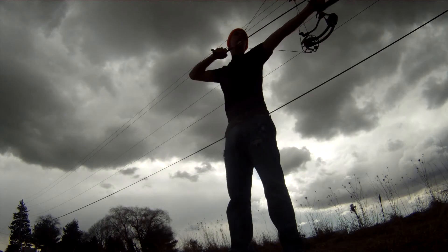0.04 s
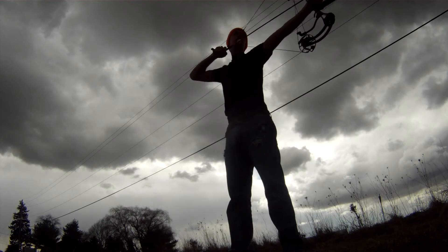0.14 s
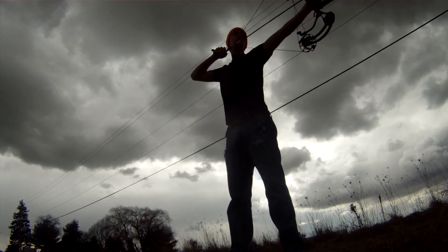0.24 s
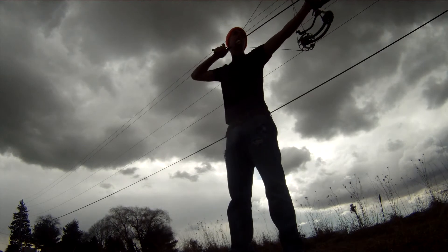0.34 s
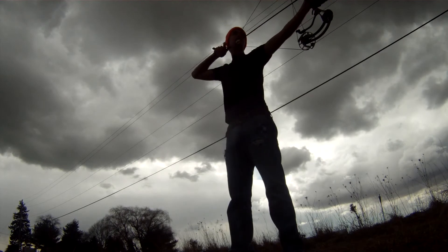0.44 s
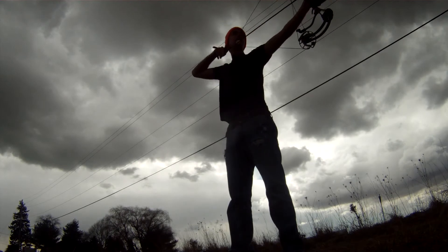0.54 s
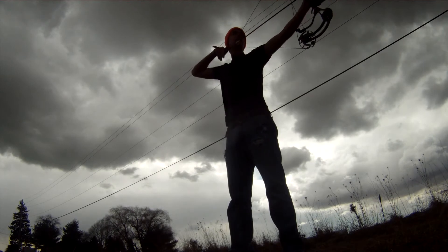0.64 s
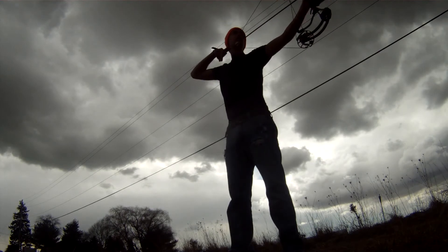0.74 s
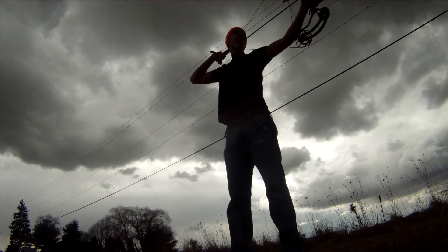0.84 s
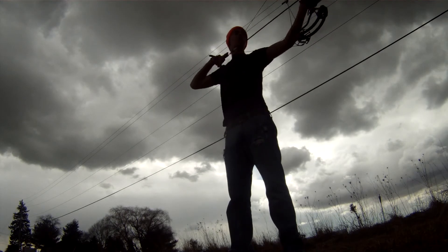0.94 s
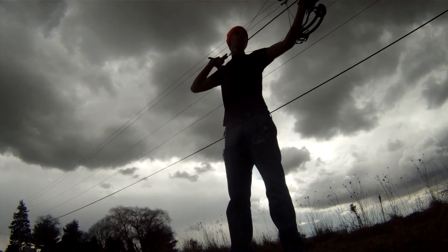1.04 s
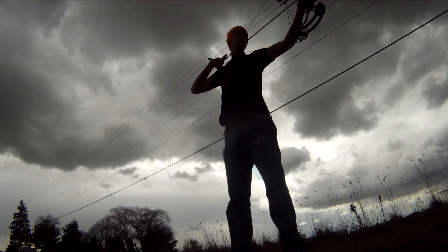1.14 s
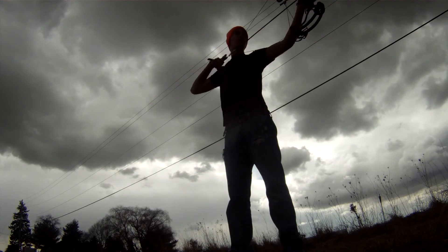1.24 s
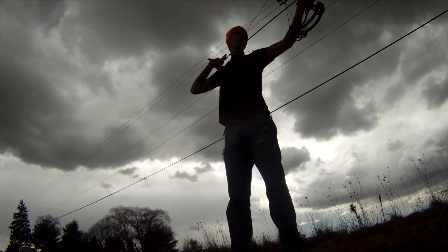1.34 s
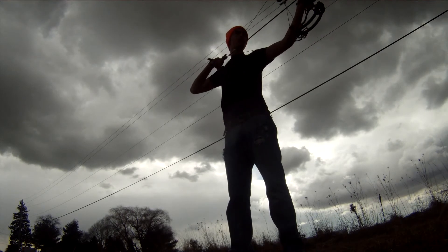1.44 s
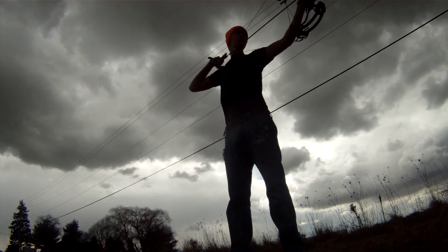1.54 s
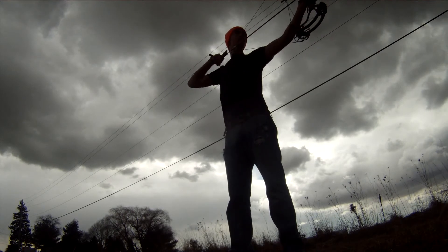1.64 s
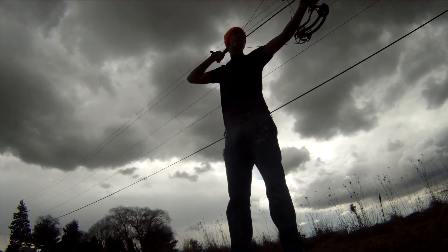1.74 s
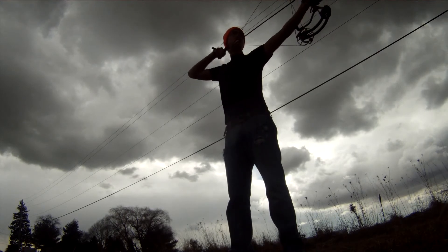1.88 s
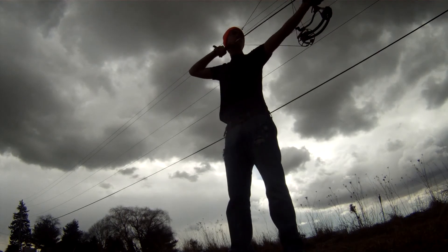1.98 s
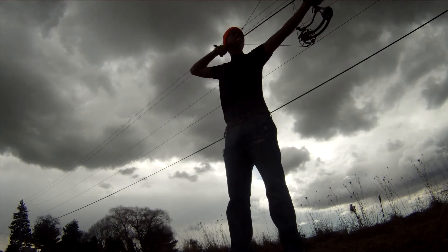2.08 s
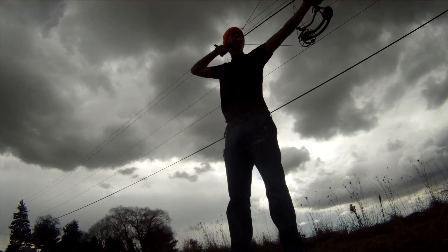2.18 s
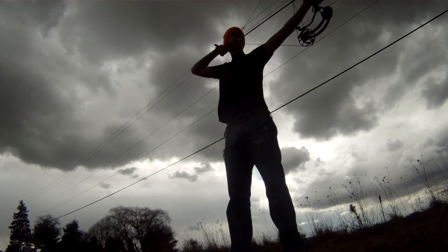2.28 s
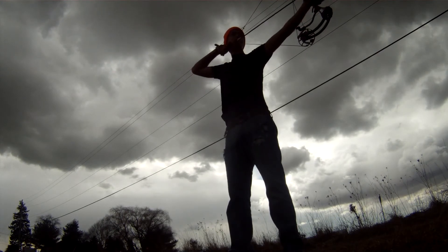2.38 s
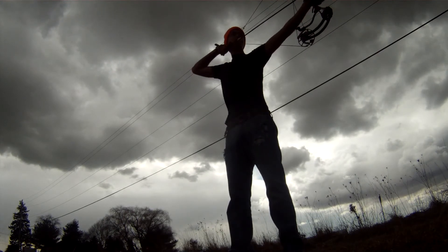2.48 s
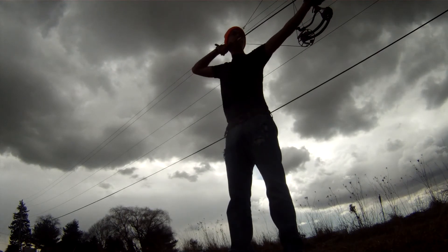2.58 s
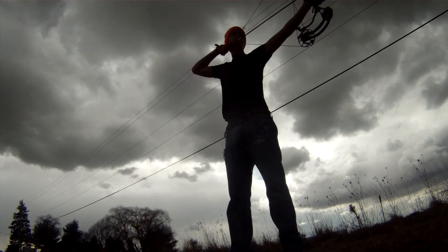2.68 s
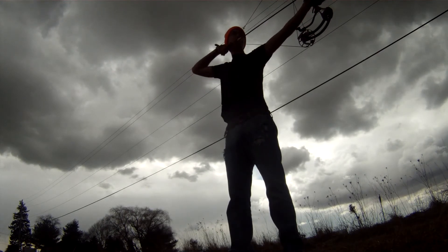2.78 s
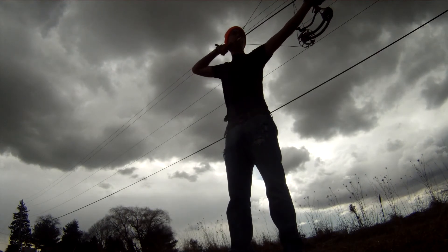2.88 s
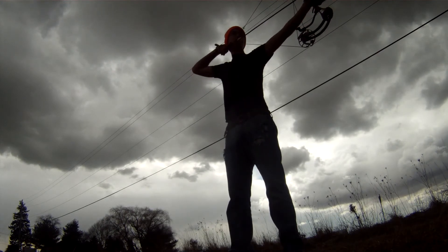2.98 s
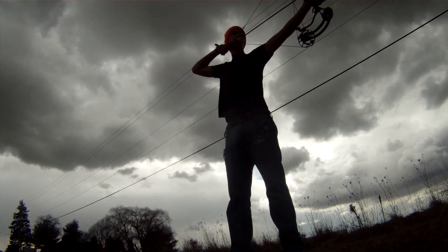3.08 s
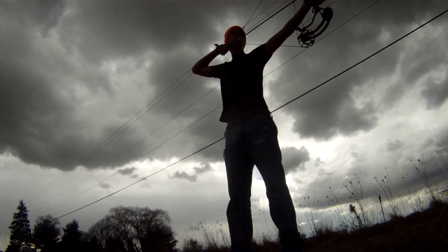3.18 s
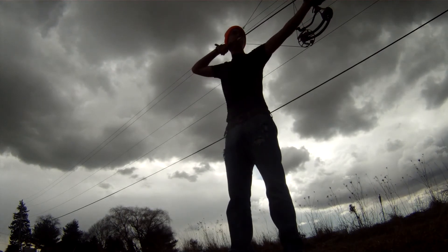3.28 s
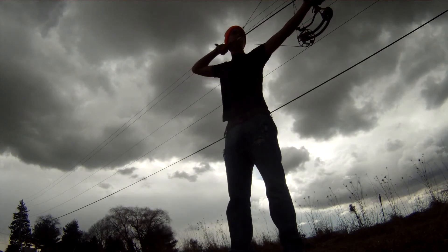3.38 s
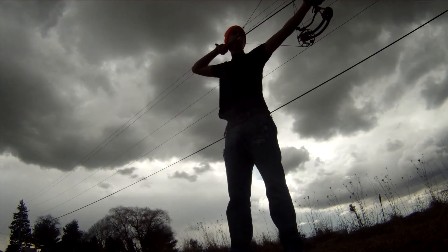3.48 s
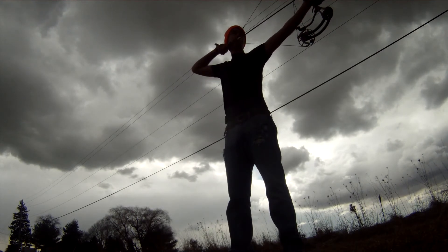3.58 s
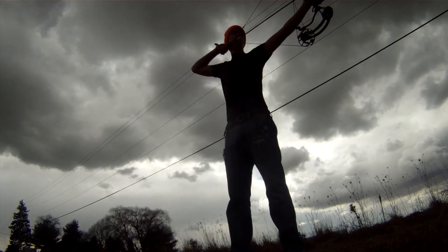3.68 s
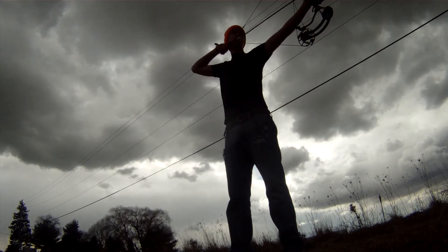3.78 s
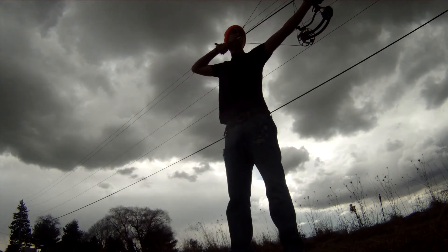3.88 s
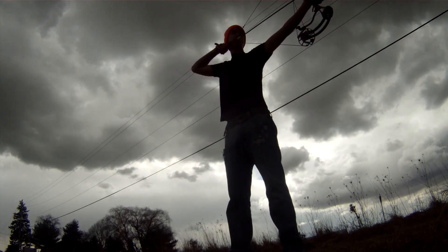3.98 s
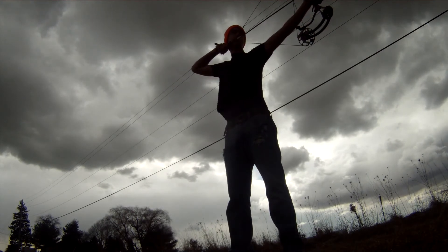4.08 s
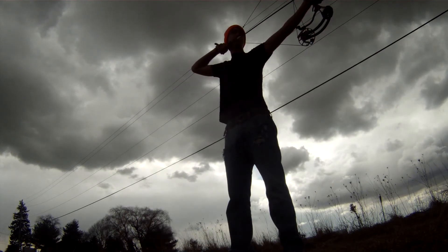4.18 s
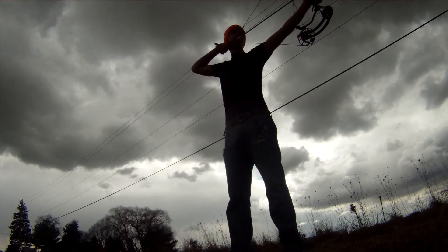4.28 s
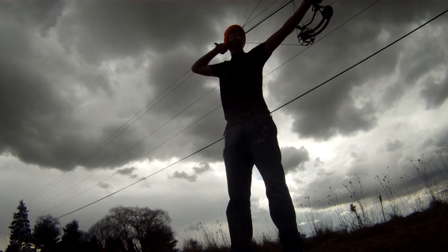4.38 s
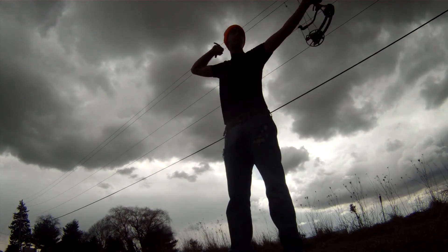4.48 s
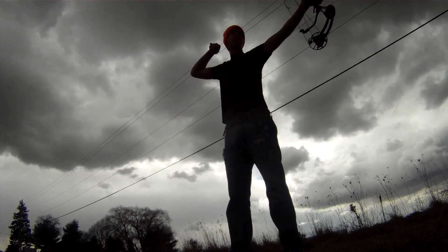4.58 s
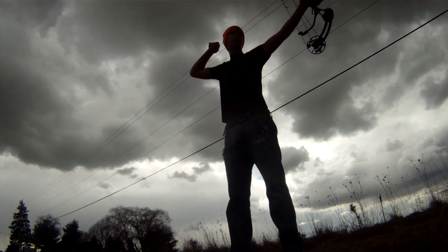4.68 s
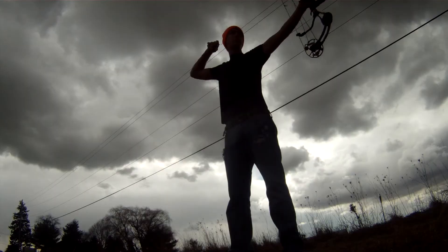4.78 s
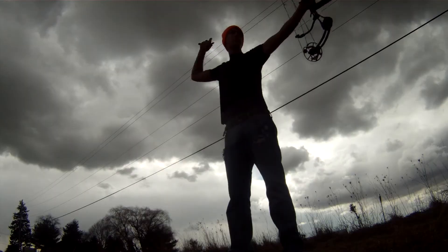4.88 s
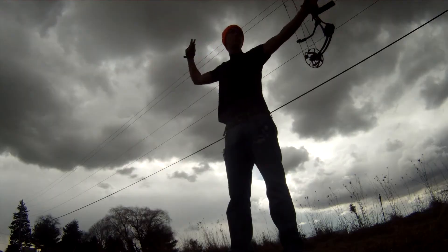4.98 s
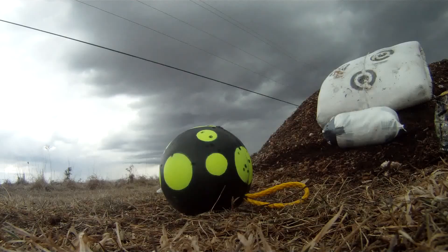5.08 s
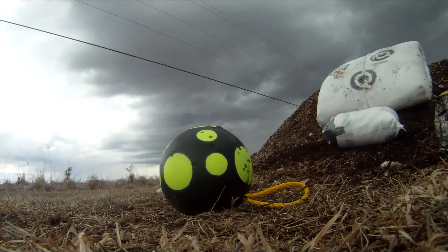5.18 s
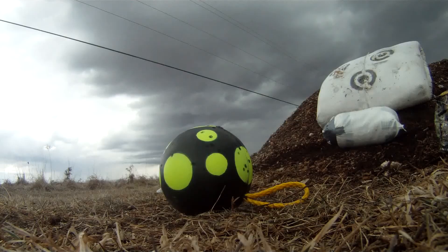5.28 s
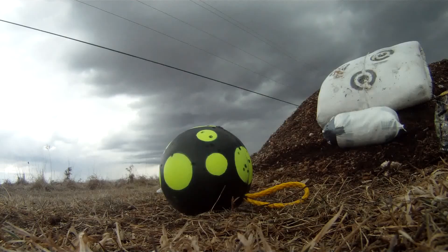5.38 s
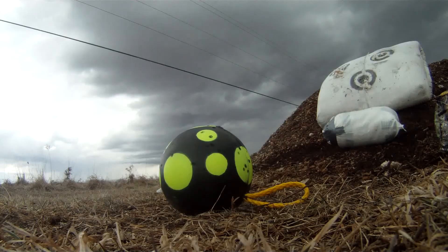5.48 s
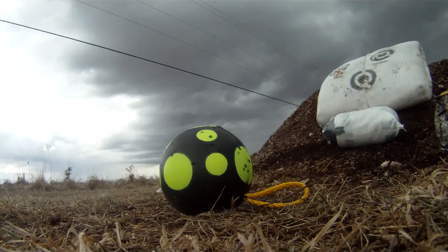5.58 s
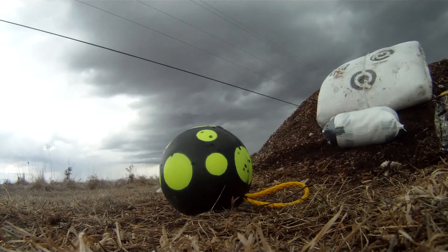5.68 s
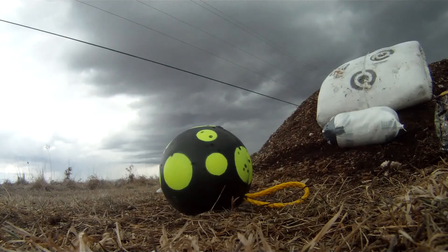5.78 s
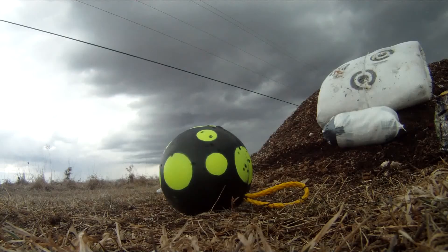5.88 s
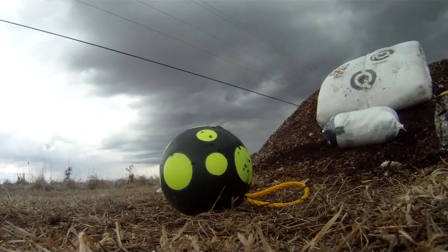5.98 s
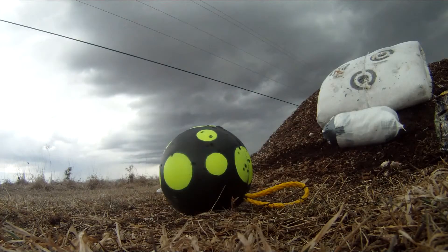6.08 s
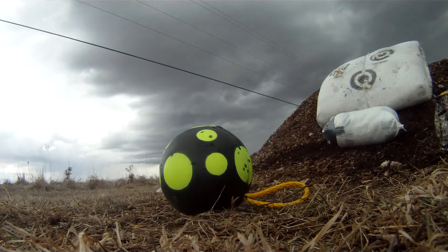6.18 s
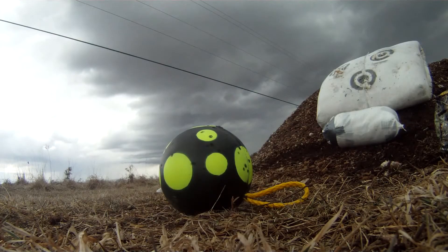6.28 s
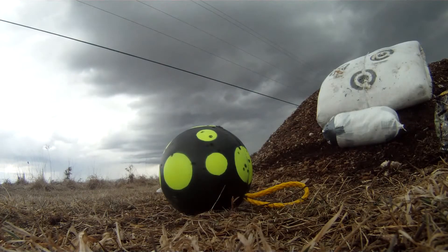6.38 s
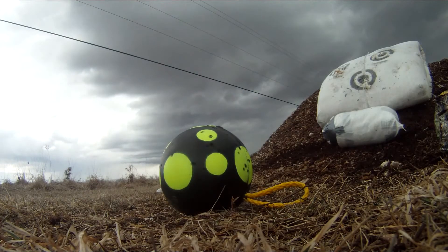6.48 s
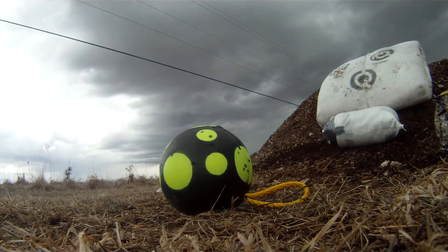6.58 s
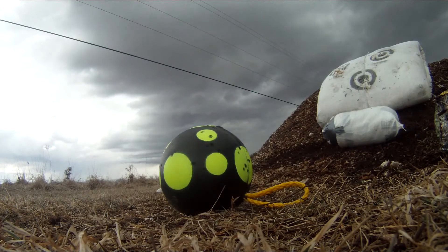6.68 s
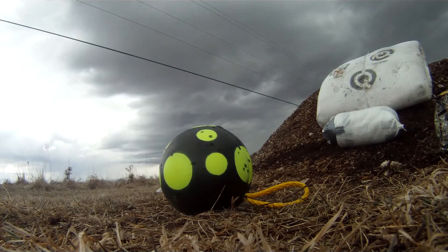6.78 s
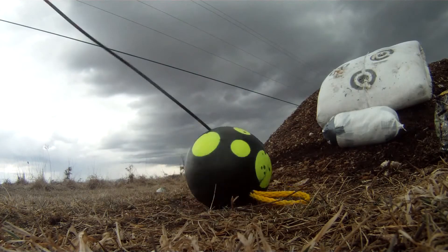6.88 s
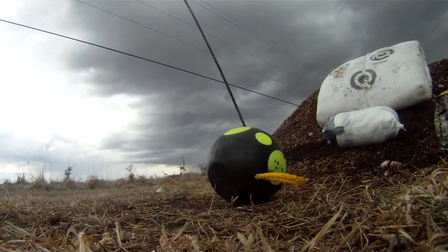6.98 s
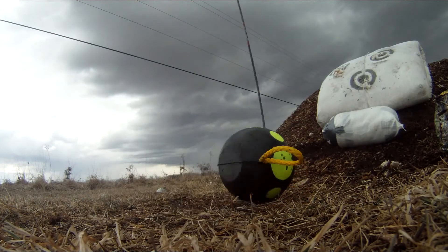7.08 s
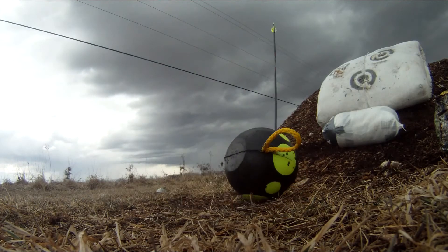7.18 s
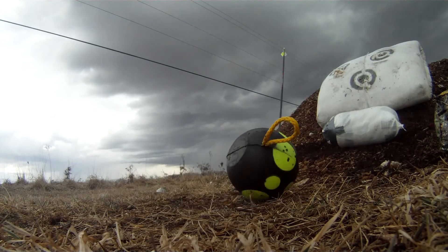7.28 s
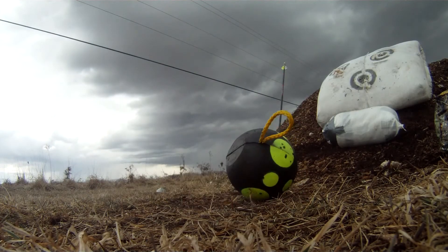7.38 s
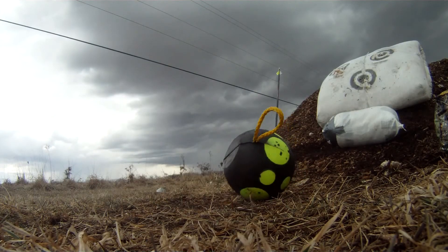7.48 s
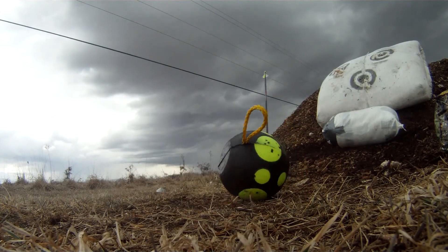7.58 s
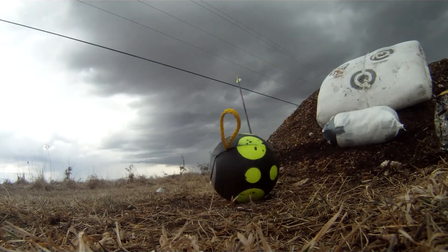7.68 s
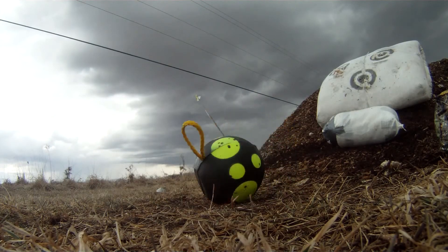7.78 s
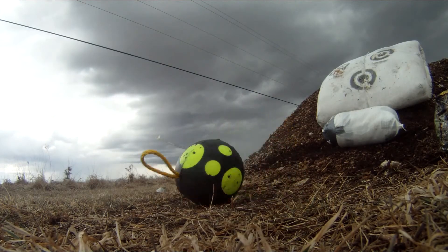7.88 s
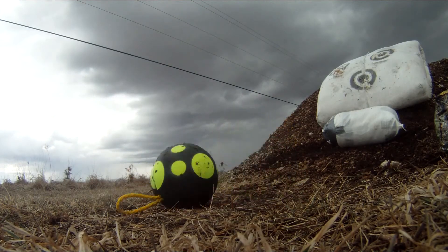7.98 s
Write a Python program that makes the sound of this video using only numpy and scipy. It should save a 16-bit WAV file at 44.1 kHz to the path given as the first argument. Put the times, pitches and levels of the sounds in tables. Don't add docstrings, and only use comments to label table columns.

```python
import sys
import numpy as np
from scipy import signal
from scipy.fft import rfft, irfft
from scipy.io import wavfile
from scipy.ndimage import uniform_filter1d

SR = 44100
rng = np.random.default_rng(int(sys.argv[2]) if len(sys.argv) > 2 else 0)


def pcm_store(signal):
    levels = np.round(np.clip(np.atleast_2d(signal), -1, 1) * 32767)
    wavfile.write(sys.argv[1], SR, levels.astype(np.int16).T)


def field_ratio(decibels):
    return 10 ** (np.asarray(decibels, dtype=float) / 20)


N = 354740
STOP_S = 4.436
HOLD_HZ = 12000

GAP_S = (5.0545, 5.1045)
# pitch in Hz, level in dB, time to fall 60 dB in seconds.
LIMB_MODES = [(225, -2.5, 0.054), (366, -3, 0.17), (402, -5, 0.066), (566, -8, 0.13), (736, -4.5, 0.042),
              (1244, -20, .1)]


def in_time(rows):
    s, *columns = np.transpose(rows)
    return [np.interp(np.arange(N) / SR, s, c) for c in columns]


def rms_one(x):
    return x / np.sqrt(np.mean(x ** 2) + 1e-20)


def drift(rate):
    r = np.exp(-80 * np.pi * rate / SR)
    noise = rng.standard_normal(N // 40 + 2002)
    slow = signal.lfilter([1], [1, -2 * r, r * r], noise)[2000:]
    return np.interp(np.arange(N) / 40, np.arange(len(slow)), rms_one(slow))


def add(out, s, burst):
    i = round(s * SR)
    out[i:i + len(burst)] += burst[:N - i]


def mode(hz, t60):
    t = np.arange(int(1.5 * t60 * SR)) / SR
    return field_ratio(-60 * t / t60) * np.sin(2 * np.pi * hz * t)


def resonance(x, hz, width):
    r = np.exp(-np.pi * width / SR)
    turn = 2 * np.pi * hz / SR
    return signal.lfilter(np.array([1, 0, -1]) * (1 - r * r) / 2, [1, -2 * r * np.cos(turn), r * r], x)


def tone(hz, db):
    return np.sqrt(2) * field_ratio(db) * np.sin(2 * np.pi * np.cumsum(hz) / SR)


def swell(s, db, rise, fall):
    t = np.arange(N) / SR - s
    return field_ratio(np.maximum(db - np.where(t < 0, -rise * t, fall * t), -200))


def bow_limbs():
    # start in seconds, level in dB, seconds of free ringing.
    jolts = [(4.434, -36, 0.0043), (4.439, -30, 0.009), (4.453, -21.5, 0.0066), (4.463, -20.5, 0.018),
             (4.476, -30, 0.012), (4.483, -29.5, 0.026), (4.504, -39, .02), (4.526, -49, 0.021),
             (6.6533, -44, 0.0067), (6.6555, -39, 0.0083), (6.6675, -42, 0.0081)]
    # start and end in seconds, pitch in Hz, level in dB.
    string_swing = (4.4388, 4.4508, 408, -13)
    out = np.zeros(N)
    spread = rng.normal(0, 1, (len(jolts), len(LIMB_MODES)))
    for (s, db, free), own in zip(jolts, spread):
        for (hz, level_db, t60), chance in zip(LIMB_MODES, own):
            ring = mode(hz, t60)
            damped_s = np.maximum(np.arange(len(ring)) / SR - free, 0)
            damping_db = np.minimum(4000 * damped_s, 12.0)
            add(out, s, field_ratio(db + level_db + 2.0 * chance - damping_db) * ring)
    start, end, hz, db = string_swing
    t = np.arange(int((end - start) * SR)) / SR
    add(out, start, field_ratio(db) * np.sin(2 * np.pi * hz * t))
    return signal.sosfilt(signal.butter(2, [170, 1100], "band", fs=SR, output="sos"), out)


def bow_rattle():
    # time in seconds, level in dB.
    shakes = [(4.412, -52.5), (4.427, -33), (4.4381, -19.5), (4.455, -27), (4.466, -28.5), (4.487, -38.5),
              (4.505, -43.5), (4.529, -44.5), (4.553, -51.5), (4.581, -53)]
    # pitch in Hz, width in Hz, level in dB.
    metal_modes = [(2300, 310, -14), (2780, 145, 0.5), (3260, 270, 0.5), (3620, 180, 1.5), (3850, 190, -1),
                   (4140, 200, -9), (4900, 510, -23.5), (5280, 510, -5.5), (1400, 380, -14.5)]
    clicks = rng.standard_normal(N) * field_ratio(2.64 * np.minimum(rng.exponential(1, N), 4))
    clicks = clicks * (rng.random(N) < 5000 / SR)
    gain = sum(swell(s, db, 6998, 751) for s, db in shakes)
    driven = rms_one(clicks) * field_ratio(14.0) * gain + 1e-18
    since = np.maximum(np.arange(N) / SR - STOP_S, 0)
    metal = np.zeros(N)
    for k, (hz, width, db) in enumerate(metal_modes):
        settle_db = 222 * abs(np.log2(hz / 3106)) * since
        metal += (-1) ** k * resonance(driven * field_ratio(db - settle_db) + 1e-18, hz, width)
    after_stop = driven * (np.arange(N) > STOP_S * SR)
    shiver = sum(field_ratio(db + 4.0) * resonance(after_stop, hz, 51) for hz, db, _ in LIMB_MODES)
    hiss = field_ratio(-10.5 - 60 * since) * resonance(driven, 4300, 3250)
    return metal + shiver + hiss


def bow():
    return bow_limbs() + bow_rattle()


def arrow():
    # start in seconds, level in dB, sign of the push, pitch in Hz, time to fall 60 dB in seconds.
    far_hits = [
        (4.8121, 12, 1, 480, .007),
        (4.8122, -10, -1, 170, .016),
        (4.8198, -2, -1, 280, .012),
        (4.8224, -1, 1, 480, .008),
        (4.8290, -13, -1, 200, .025),
        (4.8325, -20, 1, 600, .015),
        (8.033, -29, 1, 500, .02),
    ]
    near_hits = [
        (6.8640, 12.5, 1, 530, .0065),
        (6.8667, 11.5, -1, 490, .0078),
        (6.6507, -21, 1, 400, .008),
        (6.8641, -12, -1, 210, .04),
        (6.874, -28, -1, 450, .03),
        (6.878, -30, 1, 680, .06),
    ]
    out = thumps(far_hits, swell_s=.004, dull_hz=850, order=6)
    out = out + thumps(near_hits, swell_s=.00005, dull_hz=1190, order=2)
    return out + cracks() + arrow_shaft() + rushes()


def thumps(hits, swell_s, dull_hz, order):
    out = np.zeros(N)
    dull = signal.butter(order, dull_hz, fs=SR, output="sos")
    for s, db, sign, hz, t60 in hits:
        ring = mode(hz, t60)
        ring = ring * (1 - np.exp(-np.arange(len(ring)) / SR / swell_s))
        add(out, s, np.sign(sign) * field_ratio(db) * signal.sosfilt(dull, ring))
    return out


def cracks():
    # start in seconds, level in dB.
    contacts = [
        (4.8128, -41),
        (4.8208, -39),
        (4.8207, -47),
        (6.652, -57),
        (6.865, -21.5),
        (6.8658, -28.5),
        (8.033, -55),
    ]
    out, t = np.zeros(N), np.arange(SR // 50) / SR
    bright = signal.butter(3, 2900, "high", fs=SR, output="sos")
    for s, db in contacts:
        grit = signal.sosfilt(bright, rng.standard_normal(len(t)))
        add(out, s, field_ratio(db + 6.5 - 60 * t / .013) * grit)
    return out


def arrow_shaft():
    # start in seconds, level in dB.
    blows = [
        (6.6516, -44),
        (6.6526, -47),
        (6.8647, -2),
        (6.8660, -13),
    ]
    # pitch in Hz, level in dB, time to fall 60 dB in seconds.
    shaft_modes = [(1380, -11, .012), (1980, 0, .01), (2350, -12, .008), (3060, 0, .006), (3900, -10, .005),
                   (4900, -17, .004)]
    out = np.zeros(N)
    for s, db in blows:
        for hz, level_db, t60 in shaft_modes:
            add(out, s, -field_ratio(db + level_db) * mode(hz, t60))
    return out


def rushes():
    # peak time in seconds, peak level in dB, rise and fall in dB a second, centre in Hz.
    hisses = [
        (6.651, -54, 6000, 210.5, 1810),
        (6.864, -44.5, 555, 3000, 2800),
        (6.866, -39.5, 3001, 1500, 1850),
        (6.945, -58.5, 1200, 330, 2300),
        (7.005, -63, 500, 400, 2770),
    ]
    white = rng.standard_normal(N) * field_ratio(2.5 * drift(150))
    dull = rms_one(resonance(resonance(white, 1500, 2600), 1500, 2600))
    bright = rms_one(resonance(white, 2400, 1200))
    out = np.zeros(N)
    for s, db, rise, fall, hz in hisses:
        share = np.clip((hz - 1800) / 1200, 0, 1)
        out += swell(s, db, rise, fall) * ((1 - share) * dull + share * bright)
    return out


def birds():
    return near_bird() + far_bird() + bird_chips()


def near_bird():
    # start in seconds, length in seconds, top pitch in Hz, level in dB, level of the 3/2 partial in dB.
    calls = [
        (1.535, .3, 3550, -58, -26.5),
        (2.233, 0.297, 3550, -61, -40),
        (4.914, 0.54, 3626, -60, -23),
    ]
    # seconds after the start, share the pitch slips down, change of level in dB.
    voice_catches = [
        (0.1, .012, 0.5),
        (0.117, 0.015, -15),
        (.065, 0.025, -2),
    ]
    out, flutter = np.zeros(N), drift(40)
    for (s, length, top_hz, db, upper_db), catch in zip(calls, voice_catches):
        i = int(s * SR)
        add(out, s, whistle(length, top_hz, db + 1.5, upper_db, catch, flutter[i:i + int(length * SR)]))
    return out * (np.arange(N) < GAP_S[1] * SR)


def whistle(length, top_hz, db, upper_db, catch, flutter):
    # share of the length, level in dB.
    breath = [(0, -16), (.03, -9), (.12, -0.5), (.36, 0.5), (.5, -4), (.85, -6.5), (.96, -3), (1, -18)]
    t = np.arange(len(flutter)) / SR
    share, (catch_s, slip, dip_db) = t / length, catch
    since_catch = (t - catch_s) / .008
    bend = .3 * np.exp(-t / .0045) + .03 * np.exp(-t / .0304)
    bend = bend + .72 * t ** 2 + .11 * np.exp((t - length) / .017)
    hz = top_hz * (1 - bend - slip * (1 + np.tanh(since_catch)) / 2)
    effort_db = db + np.interp(share, *np.transpose(breath)) + dip_db * np.exp(-since_catch ** 2)
    lower_db = effort_db - 19 - 45 * (share - .38) ** 2 + 1.5 * flutter
    upper_db = effort_db + upper_db + 28.5 * np.minimum(share, .6) - 2.5 * flutter
    sides = tone(hz * 3 / 2, upper_db) + tone(hz * 3 / 4, lower_db) + tone(hz * 5 / 4, lower_db - 7)
    return tone(hz, effort_db + 1.8 * flutter) + sides


def far_bird():
    # start in seconds, length in seconds, first and last pitch in Hz, level in dB.
    far_notes = [
        (5.996, 0.26, 3050, 2860, -72),
        (7.958, 0.047, 3420, 3290, -66.5),
    ]
    out, flutter, waver = np.zeros(N), drift(40), drift(60)
    for s, length, start_hz, end_hz, db in far_notes:
        i = int(s * SR)
        count = min(int(length * SR), N - i)
        hz = np.linspace(start_hz, end_hz, count) * (1 + 0.0091 * waver[i:i + count])
        add(out, s, np.hanning(count) ** .5 * tone(hz, db + 3.3 * flutter[i:i + count]))
    return out


def bird_chips():
    # start in seconds, peak level in dB, first and last pitch in Hz, length in seconds.
    chip_notes = [(0.459, -61, 3600, 2400, 0.033), (2.11, -58, 3690, 2550, 0.034),
                  (2.689, -54.5, 3420, 2900, 0.027), (3.507, -61, 3180, 2800, 0.032),
                  (3.689, -56.5, 4800, 2690, 0.035), (4.062, -60, 3600, 2800, 0.031),
                  (5.186, -54.5, 3150, 3000, 0.0093), (6.382, -59, 3080, 2900, 0.013),
                  (7.575, -51.5, 3360, 2970, 0.013)]
    out = np.zeros(N)
    for s, db, start_hz, end_hz, length in chip_notes:
        count = int(length * SR)
        breath = signal.lfilter([.06], [1, -.94], rng.standard_normal(SR // 10))[:count]
        hz = np.linspace(start_hz, end_hz, count)
        add(out, s, np.hanning(count) * (.6 + 8 * breath) * tone(hz, db - 9.5))
    return out


def short_rings():
    # start in seconds, peak level in dB, pitch in Hz, time to fall 60
    # dB in seconds.
    snaps_and_pings = [(4.4355, -15, 4730, .006), (4.462, -64, 1317, 0.7), (8.032, -45, 1320, 0.0067),
                       (4.800, -51, 4500, .004), (4.8135, -37.5, 3140, 0.013), (4.813, -33.5, 5070, 0.0071),
                       (4.8205, -38, 5080, .012), (5.588, -54.5, 3700, 0.0067), (5.65, -38, 4880, 0.0055),
                       (5.650, -49, 3280, .006), (5.803, -49, 3200, 0.0075), (5.803, -54, 5000, 0.006),
                       (6.11, -54, 3500, 0.0037), (6.37, -53, 4180, .004), (6.651, -41.5, 1460, 0.046),
                       (6.665, -50, 1540, 0.051), (7.421, -55, 2100, 0.0071), (7.576, -44.5, 2750, 0.0059)]
    out = np.zeros(N)
    for s, db, hz, t60 in snaps_and_pings:
        add(out, s, field_ratio(db) * mode(hz, t60))
    return out


def wind():
    # time in seconds, level in dB.
    breeze = [(0, -49), (1.5, -57.5), (2.7, -71), (3.5, -63), (4.2, -50), (4.6, -60.5), (5.7, -58),
              (6.2, -53), (7.2, -48), (8.04, -63)]
    # time in seconds, peak level in dB.
    gusts = [(.78, -61), (1.1, -55), (1.34, -52.5), (1.72, -61), (2.93, -53), (3.38, -51), (3.52, -48),
             (3.85, -42.5), (4.03, -49.5), (5.22, -49), (5.98, -45), (6.4, -44), (7.03, -44), (7.23, -43.5),
             (7.39, -49)]
    # time in seconds, peak level in dB.
    pushes = [
        (4.44, -37),
        (4.815, -36.5),
        (6.66, -43),
        (6.868, -34.5),
    ]
    # time in seconds, peak level in dB, length in seconds.
    buffets = [(1.724, -41, 0.028), (3.518, -37, 0.02), (3.859, -29, 0.011), (3.919, -35.5, 0.022),
               (4.031, -35.5, 0.0096), (4.111, -36, 0.011), (6.696, -35, 0.018), (7.384, -40, 0.021)]
    gain = field_ratio(in_time(breeze)[0] + 2.5 * drift(6))
    gain = gain + sum(swell(s, db, 203, 130.5) for s, db in gusts)
    gain = gain + sum(swell(s, db, 602, 249) for s, db in pushes)
    band = signal.butter(2, [22, 100], "band", fs=SR, output="sos")
    out = rms_one(signal.sosfilt(band, rng.standard_normal(N))) * gain * field_ratio(-3.5)
    for s, db, length in buffets:
        u = np.linspace(-2, 4, int(3 * length * SR))
        bump = np.exp(-u ** 2 * 4.6)
        swing_back = 0.5 * np.exp(-(u - 1.2) ** 2 * 2.0)
        add(out, s - length, field_ratio(db) * (bump - swing_back))
    return out


def engine():
    # time in seconds, firing rate in Hz, load as the level of the second multiple in dB.
    engine_run = [(5.1, 88, -60), (5.5, 91.3, -57.5), (5.9, 91.2, -56), (6.22, 93.3, -50.5),
                  (6.65, 90.8, -55), (7.1, 91, -58), (7.3, 91.4, -52), (8.04, 89, -59.5)]
    hz, second_db = in_time(engine_run)
    first_db = -55.5 + .6 * (second_db + 55)
    hz = hz * (1 + 0.014 * drift(6))
    out = tone(hz, first_db + 2.5 * drift(16))
    out += tone(2 * hz, second_db + 2.5 * drift(7.5))
    out += tone(3 * hz, second_db - 16.0 + 2.0 * drift(5.5))
    out += field_ratio(-56) * rms_one(resonance(rng.standard_normal(N), 99, 4.6))
    return out * (np.arange(N) > GAP_S[0] * SR)


def air():
    # pitch in Hz, level in dB per Hz.
    field_colour = [(15, -28.5), (25, 2.5), (113, -2), (289, -11.5), (407, -14.5), (511, -12.5), (737, -19),
                    (926, -23.5), (1110, -25.5), (1300, -26.5), (5140, -38), (5900, -42.5), (7670, -78),
                    (13000, -120)]
    hz, db = np.transpose(field_colour)
    bins = np.fft.rfftfreq(N, 1 / SR)
    colour = field_ratio(np.interp(np.log(bins + 1), np.log(hz), db))
    colour = colour / np.sinc(np.minimum(bins / HOLD_HZ, .5))
    noise = irfft(rfft(rng.standard_normal(N)) * colour, N)
    bass_off = signal.sosfilt(signal.butter(1, 70, "high", fs=SR, output="sos"), rms_one(noise))
    return bass_off * field_ratio(-61.6 + 11.0 + .5 * drift(4.9))


def scene():
    return (bow() + arrow() + birds() + short_rings() + wind() + engine() + air())[None]


def duck(x):
    since = np.maximum(np.arange(N) / SR - 6.88, 0)
    return x * field_ratio(-14 * (1 - np.exp(-since / .004)) * np.exp(-since / .017))


def sample_and_hold(x):
    x = signal.sosfilt(signal.butter(8, 5800, fs=SR, output="sos"), x)
    samples = np.clip(signal.resample_poly(x, 40, 147, axis=1), -1, 1)
    held = np.repeat(np.pad(samples, [(0, 0), (0, 2)]), 4, axis=1)
    return signal.resample_poly(held, 147, 160, axis=1)[:, 6:N + 6]


def thin_top(x):
    hz, _, z = signal.stft(x, SR, nperseg=1536)
    level = uniform_filter1d(np.abs(z) ** 2, size=7, axis=1)
    top, very_top = hz > 12800, hz > 15380
    usual = np.median(level[:, top & (hz < 15380)])
    least = np.where(very_top, 1500, np.where(top, .75, 0))[:, None] * usual
    z = z * (level >= least) * np.where(very_top, field_ratio(-12.5), 1)[:, None]
    return signal.istft(z, SR, nperseg=1536)[1][:, :N]


def low_pass(x):
    return signal.sosfilt(signal.butter(12, 16350, fs=SR, output="sos"), x)


def record(dry):
    x = sample_and_hold(duck(dry))
    t = np.arange(N) / SR
    x = x * np.where((t > GAP_S[0]) & (t < GAP_S[1]), field_ratio(-62), 1)
    x = np.clip(thin_top(x), -1, 1)
    x = signal.sosfiltfilt(signal.butter(12, 16200, fs=SR, output="sos"), x)
    return low_pass(x)


dry = scene()
out = record(dry)
pcm_store(out)
```